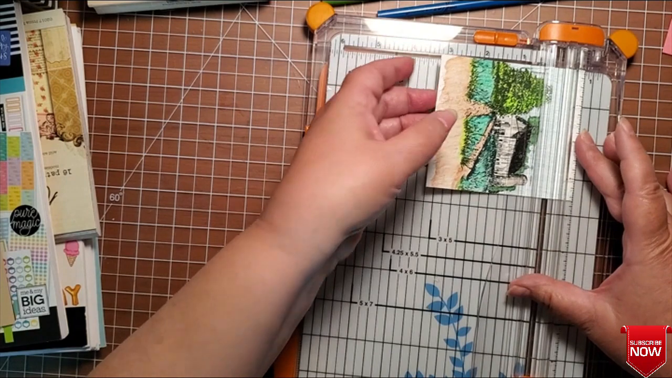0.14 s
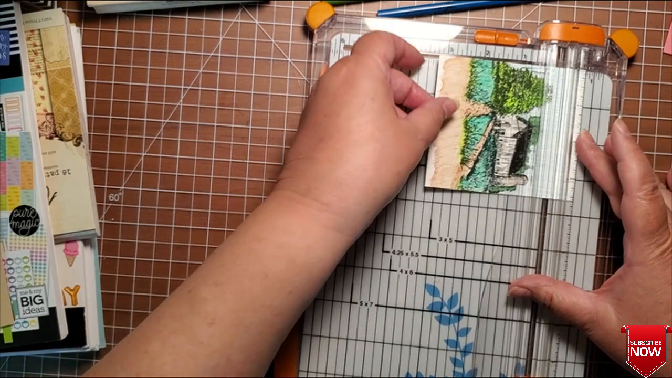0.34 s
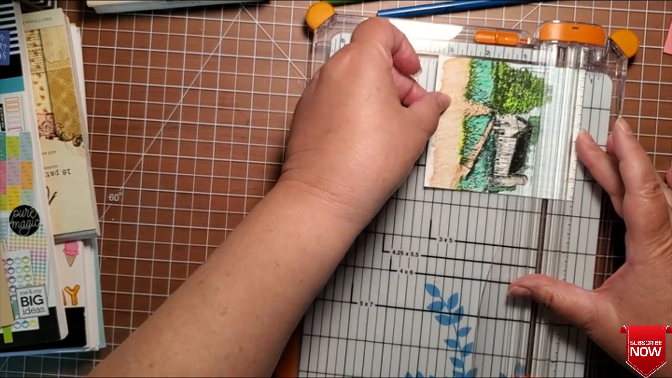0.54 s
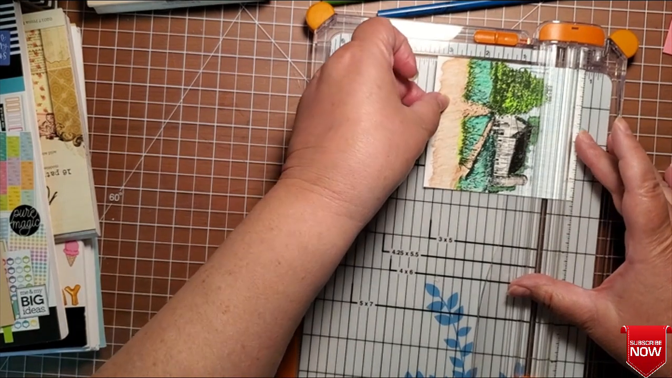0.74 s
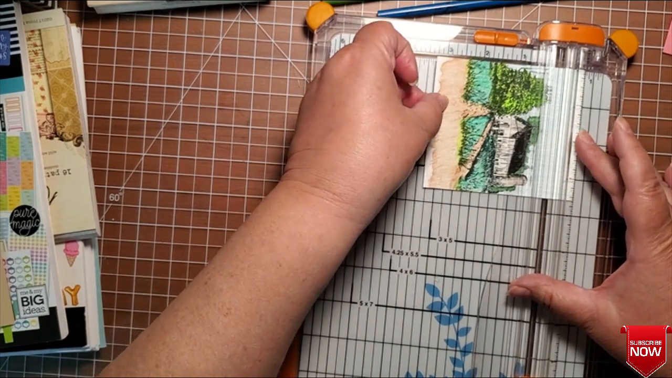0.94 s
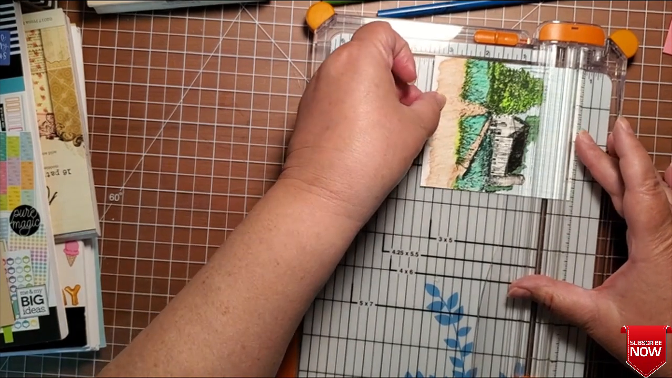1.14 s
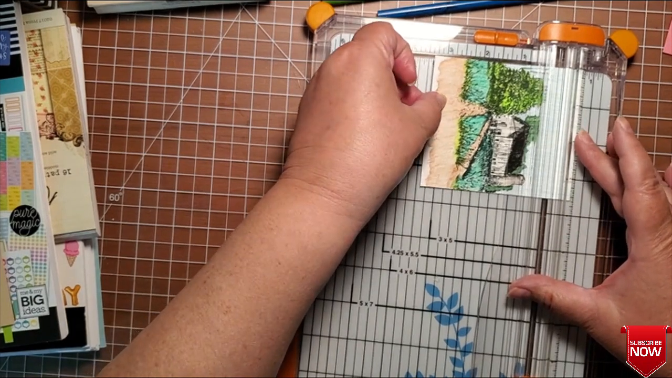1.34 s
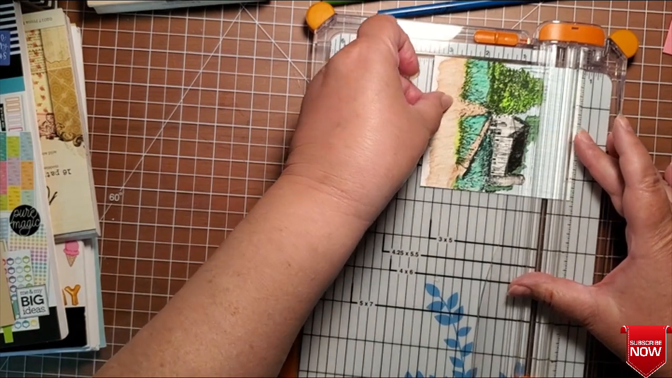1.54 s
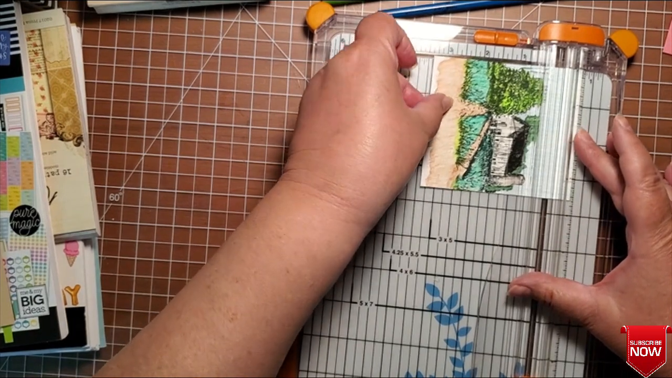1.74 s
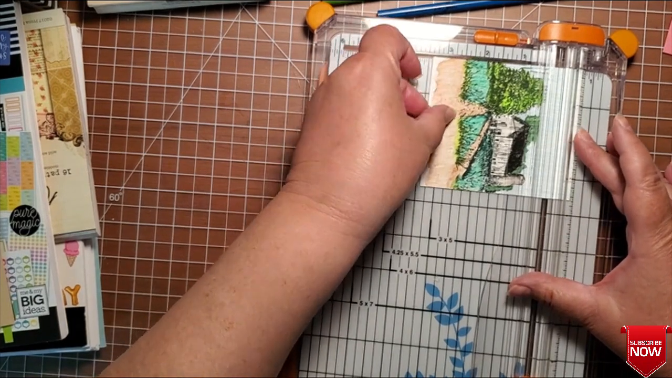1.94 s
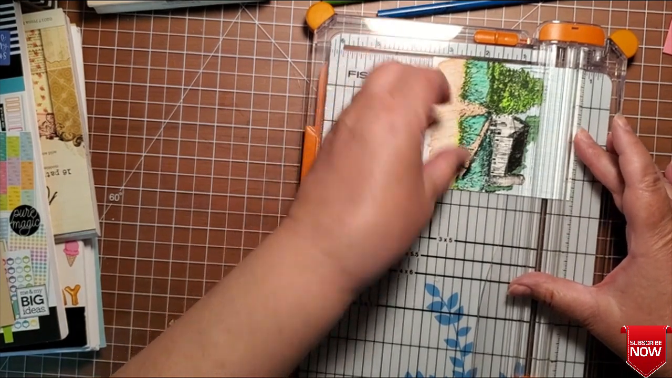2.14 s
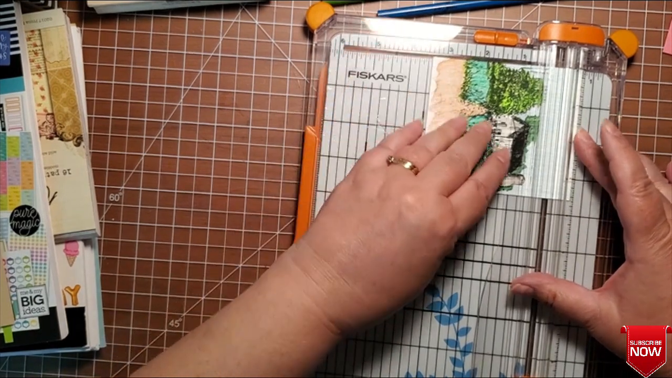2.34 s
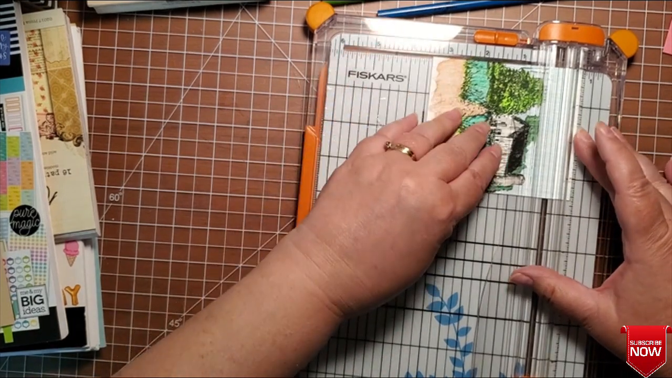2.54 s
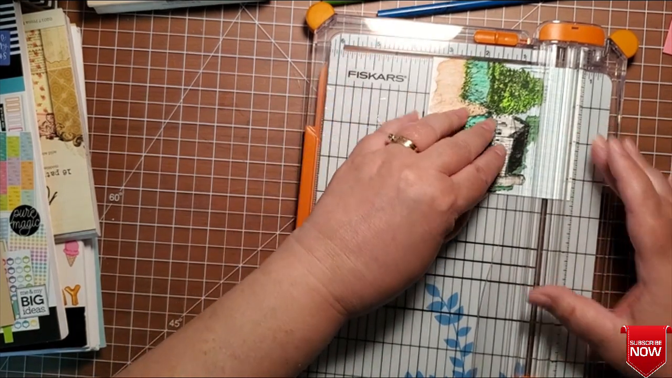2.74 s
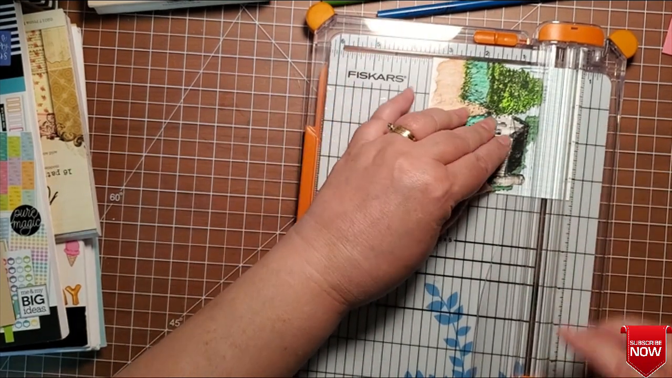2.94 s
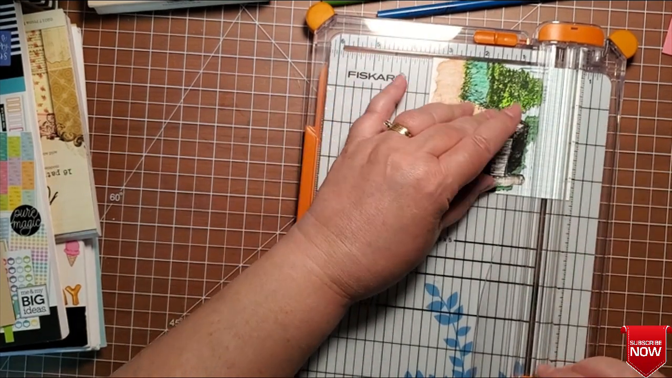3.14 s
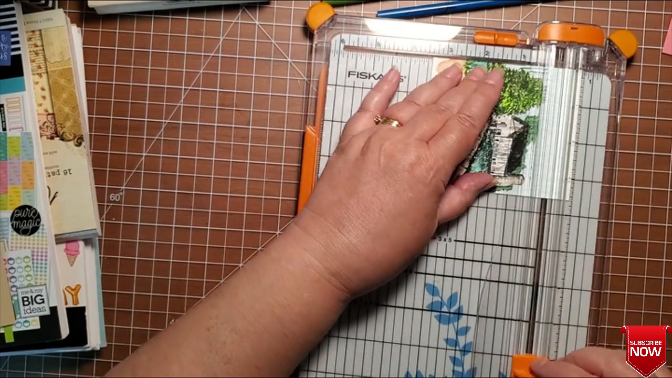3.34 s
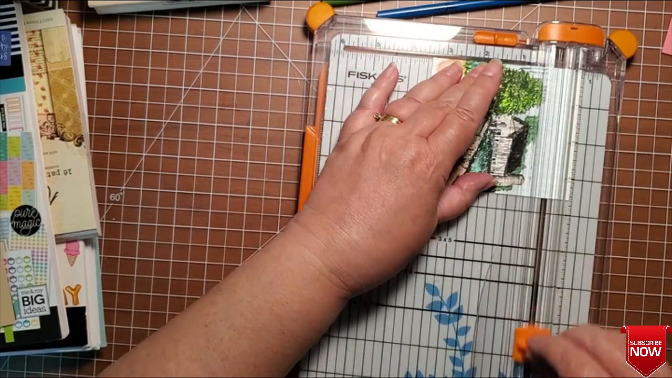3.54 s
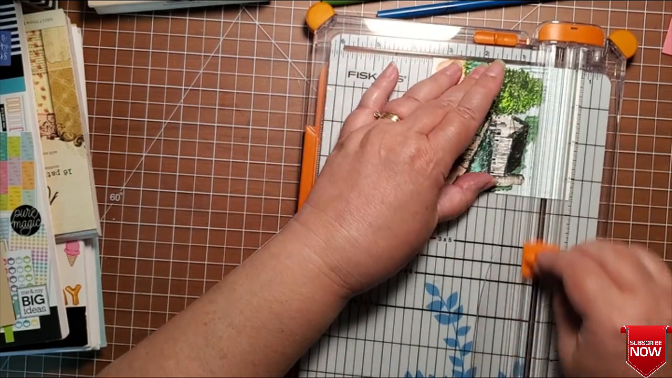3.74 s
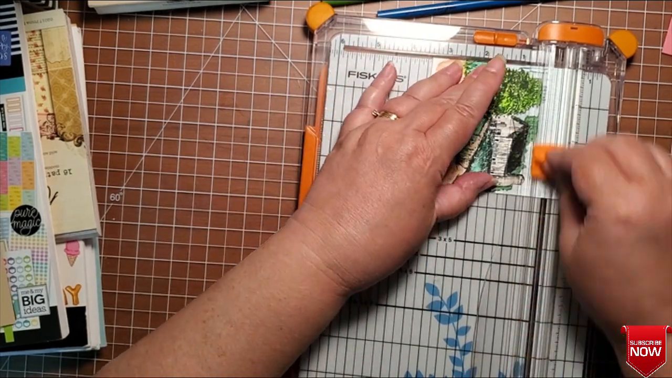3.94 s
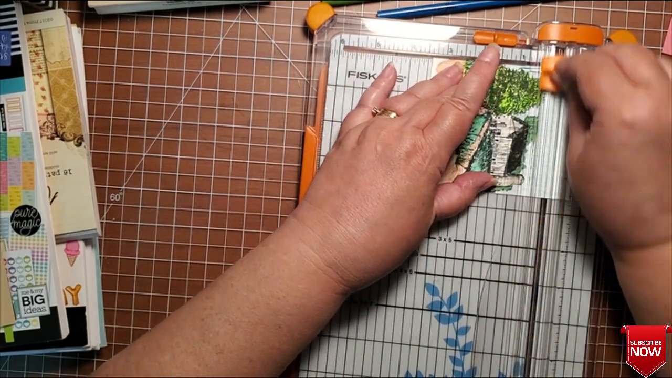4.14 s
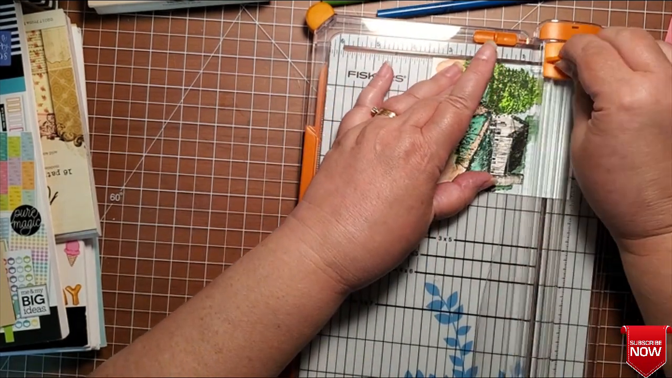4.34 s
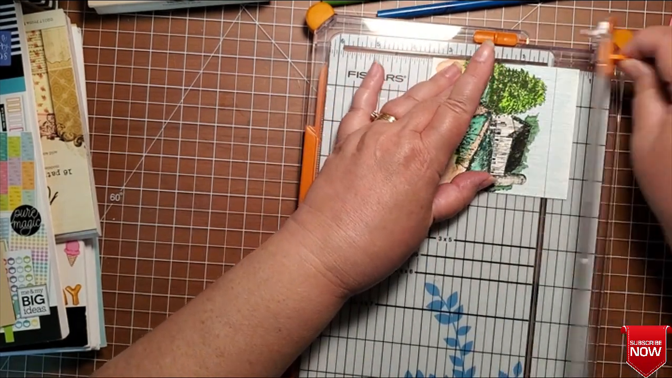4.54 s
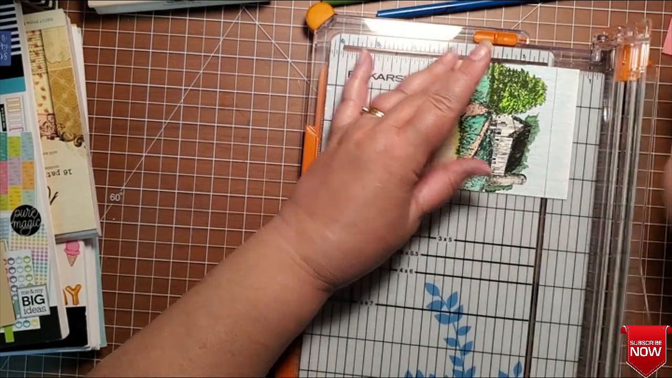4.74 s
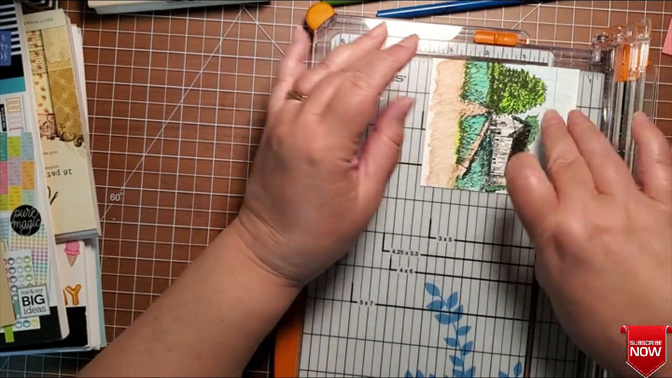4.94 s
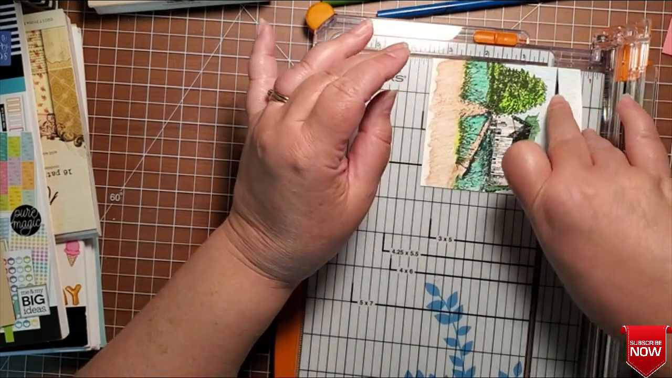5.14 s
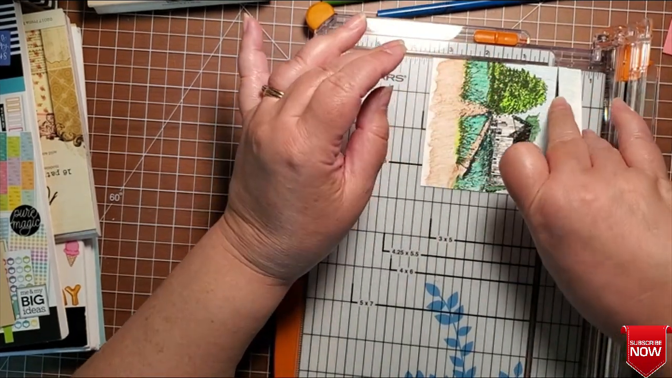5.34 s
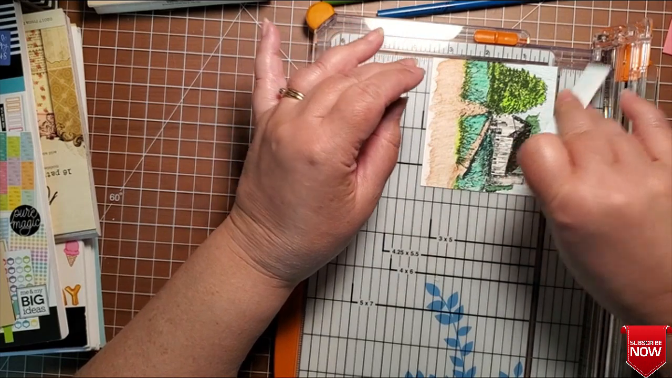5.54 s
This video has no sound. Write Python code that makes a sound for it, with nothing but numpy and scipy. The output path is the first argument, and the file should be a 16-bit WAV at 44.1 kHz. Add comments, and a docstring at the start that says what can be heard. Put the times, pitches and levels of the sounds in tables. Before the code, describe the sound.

Card is nudged into place on a paper trimmer, then the blade slides through with a short rasp and snaps against its stop.

```python
"""Cutting card on a paper trimmer

Close to a stereo microphone, on a table in a quiet room, fingers nudge card into place on a plastic trimmer.
The carriage slides up its rail, the blade rasps through the fibres, and the end stop snaps and rocks the bed.
The rail knocks open and fingers pick at the offcut, over a low room drone, mains hum and microphone hiss."""
import sys
import numpy as np
from scipy import signal
from scipy.fft import rfft, irfft
from scipy.io import wavfile
from scipy.ndimage import uniform_filter1d

SR = 44100
rng = np.random.default_rng(int(sys.argv[2]) if len(sys.argv) > 2 else 0)


def dump(signal):
    """Clip the signal to [-1, 1] and save it as 16-bit WAV at the path in sys.argv[1]."""
    limited = np.clip(np.atleast_2d(signal).T, -1, 1)
    pcm = np.round(limited * 32767).astype(np.int16)
    wavfile.write(sys.argv[1], SR, pcm)


N = 251370
TIME = np.arange(N) / SR
RING_TIME = TIME[:SR // 2]  # the half second given to each struck sound


# Tone of the rasp in the card. Each row: frequency in Hz, gain in dB.
RASP_COLOUR = [(500, -23.5), (1200, -3.5), (2000, -0.5), (2900, 0), (4600, 3.5), (6500, -7), (7500, -7.5),
               (8500, -4.5), (10500, -0.5), (13000, -7), (15800, -10.5)]
# Tone of the trimmer's bed, under blade or palm. Each row: frequency in Hz, gain in dB.
BED_COLOUR = [(70, -16.5), (150, -7), (330, 6), (420, 4), (560, 9.5), (720, -1), (900, 4), (1300, -10),
              (2500, -36.5), (8000, -70)]
# The blade's own resonances. Each row: frequency in Hz, width in Hz, gain in dB.
BLADE_RESONANCES = [(5220, 810, -2.5), (5990, 880, -1), (6450, 560, -7.5)]
# The blade rings most when deep in the card. Each row: peak time in seconds, level in dB,
# rise and fall in seconds.
ZING_SWELL = [(4.1, -40.5, 0.42, 0.1)]
CUT_START_S, CUT_END_S = 3.893, 4.198
RASP_DB, RUMBLE_DB = -39, -43.5  # steady, as the blade is pushed evenly

def blade():
    """Fibres snap one after another under the blade; they set it ringing and shake the bed below."""
    fibres = rail_resonance(friction(rate=28000, size_db=1.5, catch_rate=350, catch_db=0.9))
    rasp = unit(colour(fibres, RASP_COLOUR)) * undb(RASP_DB)
    rumble = unit(colour(fibres, BED_COLOUR)) * undb(RUMBLE_DB)
    ringing = sum(undb(db) * band(band(fibres, hz, width), hz, width)
                  for hz, width, db in BLADE_RESONANCES)
    zing = unit(ringing) * swells(ZING_SWELL)
    return (rasp + rumble + zing) * gate(CUT_START_S, CUT_END_S, edge_s=0.0065)


# The carriage gathers speed on the rail. Each row: time in seconds, relative level in dB.
SLIDE_LEVELS = [(3.47, -70), (3.498, -68.5), (3.672, -54.5), (3.734, -59), (3.885, -55)]
# Tone of its glide. Each row: frequency in Hz, gain in dB.
SLIDE_COLOUR = [(150, -12), (250, -5), (292, -18), (518, -0.5), (660, -11), (759, -15.5), (1110, -18.5),
                (1420, -9.5), (1600, -12.5), (2890, -9.5), (3150, -11.5), (6300, -15), (7760, -21.5),
                (12800, -15.5), (15800, -24.5)]

def carriage():
    """Plastic glides on plastic with a smooth hiss, all the way to the end stop."""
    slips = rail_resonance(friction(rate=26000, size_db=2.5, catch_rate=80, catch_db=-1.0))
    level_db = np.interp(TIME, *np.transpose(SLIDE_LEVELS)) + 5.0
    moving = gate(SLIDE_LEVELS[0][0] - 0.04, CUT_END_S, edge_s=0.031)
    return unit(colour(slips, SLIDE_COLOUR)) * undb(level_db) * moving


# Rail resonances under the running carriage. Each row: frequency in Hz, width in Hz, gain in dB.
RAIL_RESONANCES = [(551, 54, -24), (1068, 15.3, 4), (1477, 30, -3), (1725, 70, 3.5), (2900, 48, -2.5),
                   (2940, 140, -3), (4450, 23, 10), (5100, 57, -5), (5170, 16, -27), (5750, 420, 7),
                   (9240, 48, -3.5), (10800, 97, 9), (11050, 34, -3.5), (11700, 37, -16),
                   (12650, 120, -2.5), (14400, 71, -18)]

def rail_resonance(x, share=0.18):
    """Part of the vibration rings on in the carriage and rail."""
    ringing = sum(undb(db) * band(x, hz, width) for hz, width, db in RAIL_RESONANCES)
    return unit(x) + share * unit(ringing)


# Hard plastic contacts of carriage and rail, loudest at the end stop. Each row: start in seconds,
# level in dB, gain above 9 kHz in dB, chatter's t60 in seconds.
CLICKS = [(2.7159, -40.5, -9, 0.041), (3.4298, -35.5, -8, 0.074), (4.1964, -21, 3, 0.0073),
          (4.1988, -16, 6.5, 0.02), (4.2079, -19.5, -2, 0.028), (4.655, -37, 7, 0.059),
          (4.6858, -35.5, -2, 0.036), (4.7498, -47.5, -6, 0.029)]
# Tone of a contact. Each row: frequency in Hz, gain in dB.
CLICK_COLOUR = [(200, -6.5), (600, -17), (1200, -14), (2000, -11.5), (3000, -6), (4400, -5), (5300, -2.5),
                (6600, -5.5), (7500, -17.5), (11000, -18.5), (14000, -20.5), (16000, -47)]
# Ringing of the struck rail and carriage. Each row: frequency in Hz, relative level in dB, t60 in seconds.
RAIL_MODES = [(863, -5.5, 0.11), (1775, -3.5, 0.068), (2080, -14.5, 0.17), (2616, -7.5, 0.13),
              (2990, -9.5, 0.15), (3370, -3.5, 0.085), (3870, -9.5, 0.13), (4160, -11, .09),
              (5110, -0.5, 0.064), (5400, -1, .08), (5383, -2, .09), (5900, -4.5, .07), (6100, 8, 0.03),
              (6460, -16.5, 0.08), (9450, -18.5, 0.098), (10650, -11.5, 0.11)]

def rail_clicks():
    """Hard contacts snap, chatter for a moment and leave the rail ringing."""
    out = np.zeros(N)
    for start, db, top_db, t60 in CLICKS:
        contact = unit(signal.unit_impulse(len(RING_TIME))) + 1.28 * unit(burst(t60))
        crack = colour(colour(contact, CLICK_COLOUR), [(6000, 0.0032), (9000, top_db)])
        ringing = undb(-14) * unit_peak(ring(RAIL_MODES, scatter_db=1))
        add(out, start, undb(db) * (unit_peak(crack) + ringing))
    return out


# Dull knocks of the bed on the table. Each row: start in seconds, relative level in dB,
# then clack and thud in dB against the bed's ring.
KNOCKS = [(1.797, -52.5, -12.5, -12), (2.273, -53.5, -14, -3.5), (2.818, -55, -6.5, -5),
          (3.169, -48.5, -16, -2.5), (3.197, -51, -29, 5.5), (3.271, -49, -27, -25), (3.295, -54, -14, -21),
          (3.433, -41, 4.5, -20), (3.475, -44.5, -13, -27), (4.2026, -29.5, -12.5, -8.5),
          (4.661, -40, -16, -6), (4.6725, -28, -15, -7.5), (4.688, -41.5, -0.5, -7),
          (4.7712, -35.5, -18, -9), (4.990, -53, -11, -5), (5.148, -55, -9.5, -1.5)]
# Ringing of the bed. Each row: frequency in Hz, relative level in dB, t60 in seconds.
BED_MODES = [(297, -9, 0.067), (387, -20, 0.045), (551, 1.5, 0.036), (590, -1, 0.014), (751, -2, 0.039),
             (863, -7.5, 0.029), (1300, -16, 0.056)]

def bed_knocks():
    """The bed rocks on the table: its modes, a contact clack and a dull thud."""
    flap_colour = [(100, -5.5), (300, 0.5), (560, -2), (900, -6), (1200, -25), (2500, -29.5), (9000, -69)]
    clack_colour = [(200, -28), (700, 0.5), (1800, -1.5), (3000, -5), (7000, -35), (12000, -45.5)]
    thud_modes = [(199.4, -8.0, 0.094), (263, -6.0, 0.053)]
    out = np.zeros(N)
    for start, db, clack_db, thud_db in list(KNOCKS) + rocking():
        flap = colour(burst(0.045), flap_colour)
        ringing = colour(ring(BED_MODES, scatter_db=0.5), [(1000, -2.5), (4000, -20.5)])
        body = unit_peak(ringing) + 0.37 * unit_peak(flap)
        clack = unit_peak(colour(burst(0.063), clack_colour))
        thud = unit_peak(ring(thud_modes, scatter_db=3.5) * (1 - fade(0.021)))
        add(out, start, undb(db - 3) * (body + undb(clack_db) * clack + undb(thud_db) * thud))
    return out


def rocking(start_s=4.209, gap_s=0.049, shrink=0.75, loss_db=6, soften_db=13):
    """Four more knock rows: after the end stop the trimmer lands ever sooner, weaker and softer."""
    first_db, clack_db, thud_db = -27, -3, -5.5
    landings = [start_s + gap_s * np.sum(shrink ** np.arange(k)) for k in range(4)]
    return [(start, first_db - k * loss_db, clack_db - k * soften_db, thud_db)
            for k, start in enumerate(landings)]


# Small snaps of the card under the fingers. Each row: start in seconds, relative level in dB,
# pitch in Hz, t60 in seconds.
CARD_TICKS = [(0.0576, -40, 5900, 0.016), (0.066, -45, 3540, 0.13), (0.189, -44.5, 2960, 0.03),
              (0.209, -55, 2970, 0.031), (0.306, -43, 2830, 0.05), (0.3208, -36.5, 2920, 0.037),
              (0.3263, -32.5, 2660, 0.022), (0.5556, -49, 4500, 0.088), (1.076, -53.5, 3170, 0.052),
              (1.7851, -48, 4130, 0.04), (1.7912, -42.5, 6370, 0.029), (2.816, -46.5, 5440, 0.018),
              (5.1436, -47.5, 5450, 0.018), (5.1552, -47, 5940, 0.059), (5.4168, -51, 5140, 0.021),
              (5.473, -51.5, 4900, 0.07), (5.679, -38, 7200, 0.031)]
# Tone of a snap. Each row: frequency in Hz, gain in dB.
TICK_COLOUR = [(400, 3.5), (1200, -10), (2200, -8), (2900, -2.5), (4500, -8.5), (6500, -6), (7500, -23),
               (12000, -10), (16000, -22)]

def card_ticks():
    """The card's edge flicks free: a short crackle around one pitch, thin below it."""
    out = np.zeros(N)
    for start, db, hz, t60 in CARD_TICKS:
        top_db = -5.5 + 6.5 * np.log2(hz / 3000)  # higher snaps are also crisper
        knee_hz = min(hz, 7000)
        tilt = [(0.34 * knee_hz, -8), (knee_hz, 0), (7500, 0), (9000, top_db)]
        crackle = colour(colour(burst(t60), TICK_COLOUR), tilt)
        pitched = unit(band(crackle, hz, width_hz=1100))
        add(out, start, undb(db - 4.5) * unit_peak(unit(crackle) + 2.06 * pitched))
    return out


# Fingers and card brush over the bed; a nail drags along the card's edge.
# Each row: peak time in seconds, relative level in dB, rise and fall in seconds.
FINGER_RUBS = [(0.06, -62.5, 0.071, 0.063), (0.33, -73, 0.39, 0.16), (1.12, -78.5, 0.08, 0.1),
               (1.52, -78, 0.091, 0.13), (1.792, -69, 0.047, 0.043), (1.94, -71.5, 0.062, 0.12),
               (2.11, -72.5, 0.04, 0.2), (2.77, -68, 0.16, 0.33), (2.97, -78, 0.026, 0.15),
               (3.2, -60, 0.055, 0.084), (3.4, -74.5, 0.3, 0.12), (4.55, -78, 0.49, 0.53),
               (4.7, -64, 0.053, 0.11), (5.16, -73.5, 0.03, 0.14), (5.395, -68.5, 0.22, 0.054),
               (5.495, -66, 0.053, 0.096), (5.66, -67.5, 0.09, 0.15)]
NAIL_SCRAPES = [(0.205, -56.5, 0.11, 0.19), (0.295, -54, 0.053, 0.06)]
# Tone of each. Each row: frequency in Hz, gain in dB.
RUB_COLOUR = [(300, -0.5), (600, -6), (1000, -9), (2200, -8), (3000, 0.5), (4500, -2), (6300, 3),
              (7500, -12), (9000, -8.5), (12000, -6), (14000, -8), (16000, -28.5)]
NAIL_COLOUR = [(400, -21), (560, -6.5), (750, -30.5), (2100, -18.5), (2850, -4.5), (3500, -9.5),
               (4200, -18), (6000, -24), (8000, -41)]

def fingers():
    """Skin and card brush softly; a nail drags in coarser jerks."""
    brush = unit(colour(friction(rate=16000, size_db=0.5, catch_rate=150, catch_db=1.6), RUB_COLOUR))
    drag = unit(colour(friction(rate=1900, size_db=8.5, catch_rate=110, catch_db=3.5), NAIL_COLOUR))
    return brush * swells(FINGER_RUBS) * undb(4.5) + drag * swells(NAIL_SCRAPES)


# The heel of a hand shifts on the bed. Each row: peak time in seconds, relative level in dB,
# rise and fall in seconds.
PALM_SHIFTS = [(1.8, -73, 0.12, 0.11), (1.98, -65.5, 0.25, 0.08), (2.735, -62, 0.1, 0.16),
               (2.965, -65, 0.02, 0.15), (3.17, -54, 0.042, 0.078), (3.285, -58, 0.043, 0.12),
               (3.57, -59, 0.07, 0.027), (3.675, -47.5, 0.036, 0.115), (3.8, -55, 0.11, 0.15),
               (4.48, -64, 0.086, 0.11), (5.305, -66, 0.038, 0.052)]

def palm():
    """A hand's weight slips on the bed in dull little jerks."""
    scuff = unit(colour(friction(rate=1100, size_db=1, catch_rate=86, catch_db=3.0), BED_COLOUR))
    return scuff * swells(PALM_SHIFTS) * undb(-6.5)


# The table under the cut. Each row: peak time in seconds, level in dB, rise and fall in seconds.
TABLE_SHUDDER = [(4.05, -44, 0.23, 0.3)]
# Heavy blows that rock it. Each row: start in seconds, relative level in dB.
TABLE_BLOWS = [(3.192, -51), (4.203, -42.5), (4.289, -43.5), (4.672, -64)]
# Its sway. Each row: frequency in Hz, relative level in dB, t60 in seconds.
TABLE_MODES = [(36.2, -4, 0.99), (81.5, -2, 0.52), (96, -1, 0.4), (163.5, -6, 0.33)]

def table():
    """The table top shudders under the cut and sways on after the heavier blows."""
    out = boom(hz=61, width_hz=43) * swells(TABLE_SHUDDER)
    envelope = (1 - fade(0.03)) * (1 - RING_TIME / RING_TIME[-1])
    for start, db in TABLE_BLOWS:
        add(out, start, undb(db) * ring(TABLE_MODES, scatter_db=2.5) * envelope)
    return out


# The microphone's right port is shaded and its left one resonates.
# Each row: frequency in Hz, left minus right in dB.
PORT_BALANCE = [(250, 2), (500, 1), (1200, 1.5), (2200, 2), (3200, 7.5), (4200, 4.5), (5500, 10),
                (7000, 11.5), (9000, 5), (12000, 3), (16000, 4)]
ROOM_T60_S = 0.25

def at_microphone(x, pan_db, near_db, near_t60, room_db):
    """Direct sound reaches the right port first; the table scatters treble, the room adds a short tail."""
    channels = []
    for lag_samples, side in ((4, 1), (0, -1)):  # left, then right
        near = colour(reflections(x, near_t60), [(200, -12.5), (900, -4.5), (2500, 3.0)])
        tail = unit(burst(ROOM_T60_S) * (1 - fade(0.038)))
        tail = colour(tail, [(150, 6), (500, 2), (5000, -2.0), (14000, -5)])
        far = convolve(x, tail) / np.sqrt(len(RING_TIME))
        heard = np.roll(x, lag_samples) + undb(near_db) * near + undb(room_db) * far
        heard /= np.hypot(1, undb(near_db))
        # only short waves are shaded by the microphone's body
        shading = [(hz, side * (db + pan_db * min(hz / 4000, 1)) / 2) for hz, db in PORT_BALANCE]
        channels.append(colour(heard, shading))
    return np.array(channels)


def reflections(x, t60, change_rate=22, count=4):
    """Reflections off the hands and table, whose paths keep changing as the hands move."""
    shares = np.array([walk(change_rate) for _ in range(count)])
    shares /= np.sqrt(np.sum(shares ** 2, axis=0))
    return sum(share * convolve(x, unit(burst(t60))) for share in shares) / np.sqrt(len(RING_TIME))


# The room's low drone wavers. Each row: time in seconds, level in dB.
DRONE_LEVELS = [(0, -47.5), (0.7, -54.5), (1.65, -50.5), (2.02, -45), (2.14, -62), (2.62, -65.5),
                (2.85, -46), (3.6, -53.5), (4.9, -53.5), (5.4, -50)]
# Tone of the room's rumble and of each channel's hiss. Each row: frequency in Hz, gain in dB.
ROOM_COLOUR = [(20, -22.5), (35, -8.5), (50, -13), (61, -3.5), (75, -5.5), (100, -11.5), (140, -21),
               (250, -28.5), (450, -39.5), (800, -66), (2000, -60.5)]
HISS_LEFT = [(500, -7), (1400, -14), (2300, -16.5), (3000, 0), (3800, 4), (4500, -1.5), (5500, 1.5),
             (6500, -4.5), (7500, -22), (9000, -25), (12000, -17.5), (16000, -25)]
HISS_RIGHT = [(500, 13), (2000, -4), (3300, 2), (5500, -3.5), (8000, -16), (12000, -3.5), (16000, -22.5)]

def room_tone():
    """The room rumbles and drones around the mains hum; the microphone hisses, most on the left."""
    rumble = undb(-56.5) * unit(colour(rng.standard_normal(N), ROOM_COLOUR))
    drone = boom(hz=61.24, width_hz=12.6) * undb(np.interp(TIME, *np.transpose(DRONE_LEVELS)))
    mains_phase = 2 * np.pi * 60 * TIME
    hum = undb(-59.5) * np.sin(mains_phase) + undb(-66.5) * np.sin(2 * mains_phase)
    left = undb(-61.5) * unit(colour(rng.standard_normal(N), HISS_LEFT))
    right = undb(-74.0) * unit(colour(rng.standard_normal(N), HISS_RIGHT))
    return rumble + drone + hum + np.array([left, right])


def friction(rate, size_db, catch_rate, catch_db):
    """Tiny uneven slips, `rate` a second, bunched as the contact catches and lets go."""
    slips = (rng.random(N) < rate / SR) * rng.choice([-1, 1], N)
    sizes = undb(size_db * rng.standard_normal(N))
    return slips * sizes * undb(catch_db * walk(catch_rate))


def swells(moves, drop_db=19, roundness=1.28):
    """Gain of sliding moves, each drop_db below its peak at one rise or fall time away."""
    gain = np.zeros(N)
    for peak_s, db, rise_s, fall_s in moves:
        away = np.maximum((peak_s - TIME) / rise_s, (TIME - peak_s) / fall_s)
        gain += undb(db - drop_db * away ** roundness)
    return gain


def ring(modes, scatter_db):
    """Struck modes; each blow lands on another spot and weights them differently."""
    out = np.zeros(len(RING_TIME))
    for hz, db, t60 in modes:
        weight = undb(db + scatter_db * rng.standard_normal()) * rng.choice([-1, 1])
        out += weight * np.sin(2 * np.pi * hz * RING_TIME) * fade(t60)
    return out


def burst(t60):
    """A dying burst of noise."""
    return rng.standard_normal(len(RING_TIME)) * fade(t60)


def boom(hz, width_hz):
    """Narrow low noise at rms 1."""
    return unit(band(band(rng.standard_normal(N), hz, width_hz), hz, width_hz))


def walk(rate):
    """A random drift with `rate` turns a second and a spread near 1."""
    steps = rng.standard_normal(N // 20)
    return np.sqrt(1.5) * np.interp(TIME * rate, np.arange(len(steps)), steps)


def fade(t60):
    """Exponential decay, 60 dB down after t60 seconds."""
    return np.exp(-np.log(1000) * RING_TIME / t60)


def gate(start, end, edge_s):
    """One between two times, with short ramps."""
    return np.clip((TIME - start) / edge_s, 0, 1) * np.clip((end - TIME) / edge_s, 0, 1)


def colour(x, points, size=8192):
    """Causal filter whose gain follows (Hz, dB) points."""
    hz, db = np.transpose(points)
    bins_hz = np.fft.rfftfreq(size, 1 / SR)
    gain = undb(np.interp(np.log(bins_hz + 1), np.log(hz), db))
    cepstrum = irfft(np.log(gain))[:size // 2]
    cepstrum[1:] *= 2  # minimum phase
    return convolve(x, irfft(np.exp(rfft(cepstrum, size))))


def band(x, hz, width_hz):
    """One resonance, gain 1 at its centre."""
    return signal.lfilter(*signal.iirpeak(hz, hz / width_hz, fs=SR), x)


def convolve(x, response):
    """Pass a sound through a response, keeping its length."""
    return signal.fftconvolve(x, response)[:len(x)]


def add(track, start_s, sound):
    """Mix a sound in at a time."""
    start = int(start_s * SR)
    track[start:start + len(sound)] += sound[:N - start]


def undb(db):
    """Decibels to gain."""
    return 10 ** (np.asarray(db) / 20)


def unit(x):
    """Scale to rms 1."""
    return x / np.sqrt(np.mean(x ** 2))


def unit_peak(x, size=176):
    """Scale so that the loudest few milliseconds have rms 1."""
    return x / np.sqrt(uniform_filter1d(x ** 2, size).max())


def scene():
    """The trimmer lies close in front of the microphone, the card a little to its left."""
    cut = at_microphone(carriage() + blade(), pan_db=1.0, near_db=0.5, near_t60=0.0513, room_db=-6.5)
    rail = at_microphone(rail_clicks(), pan_db=0.5, near_db=-5.5, near_t60=0.02, room_db=-9.5)
    bed = at_microphone(bed_knocks() + palm(), pan_db=3.5, near_db=-5.0, near_t60=0.02, room_db=-7)
    card = at_microphone(fingers() + card_ticks(), pan_db=2.0, near_db=-0.5, near_t60=0.024, room_db=-5.5)
    return cut + rail + bed + card + table() + room_tone()


def record(dry):
    """The recorder clips at full scale and cuts the treble above 15.9 kHz."""
    low_pass = signal.ellip(10, 0.2, 70, 15900, fs=SR, output="sos")
    return signal.sosfilt(low_pass, np.clip(dry, -1, 1))


dry = scene()
out = record(dry)
dump(out)
```